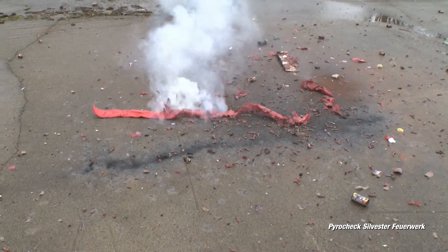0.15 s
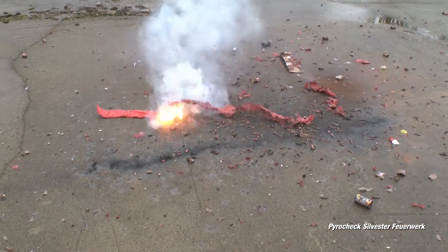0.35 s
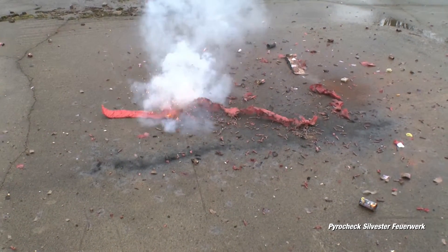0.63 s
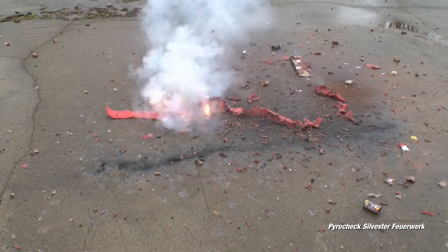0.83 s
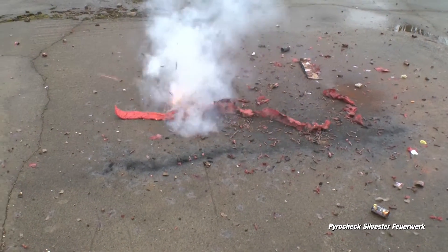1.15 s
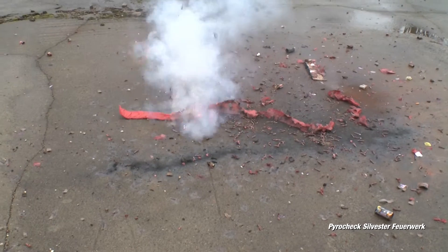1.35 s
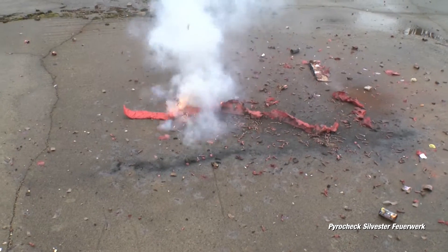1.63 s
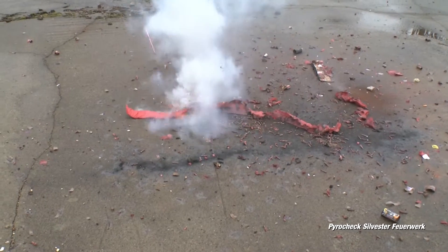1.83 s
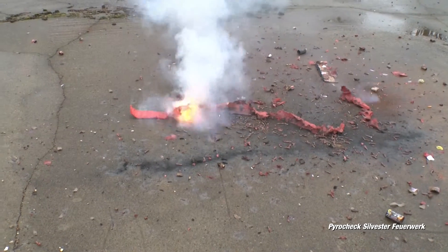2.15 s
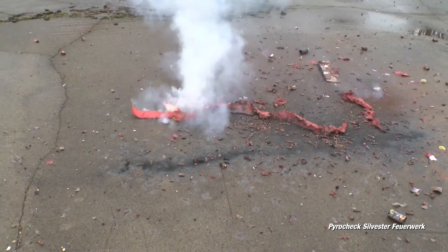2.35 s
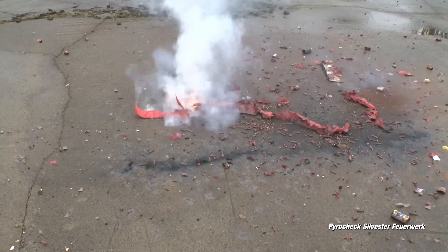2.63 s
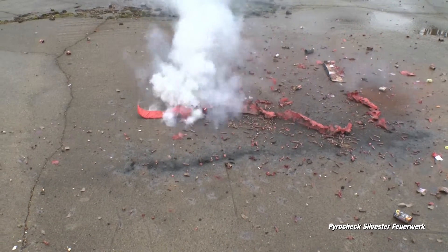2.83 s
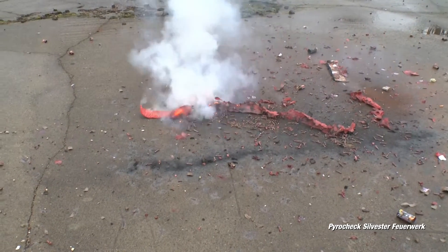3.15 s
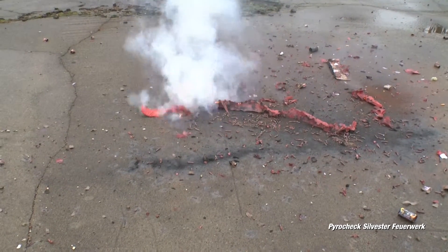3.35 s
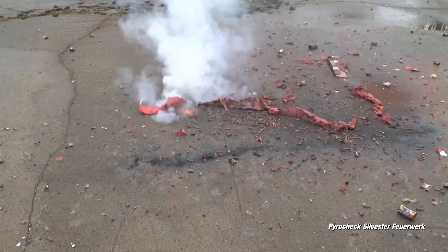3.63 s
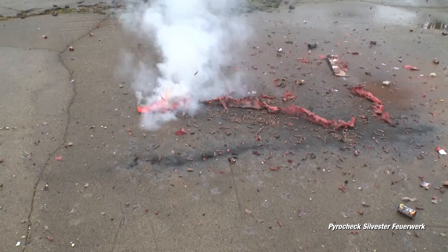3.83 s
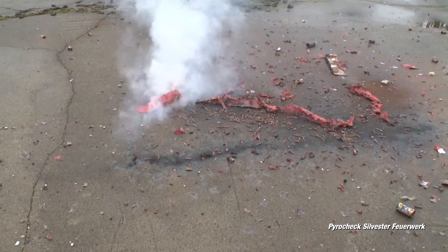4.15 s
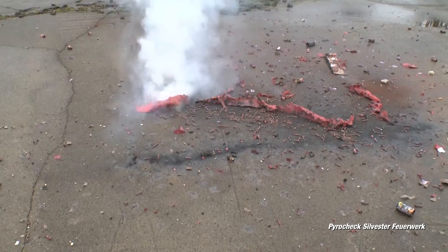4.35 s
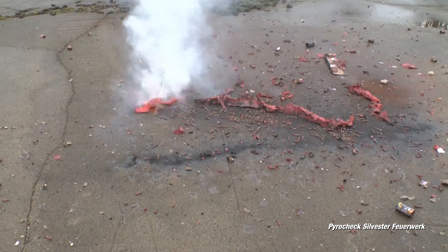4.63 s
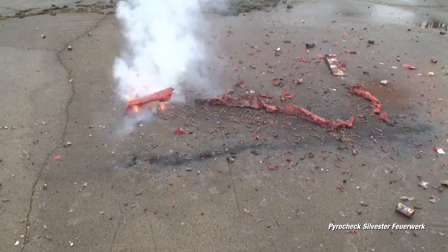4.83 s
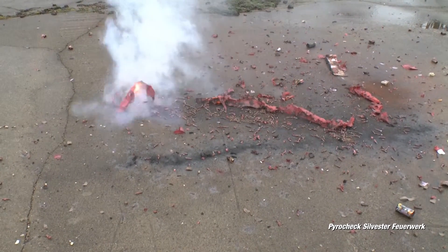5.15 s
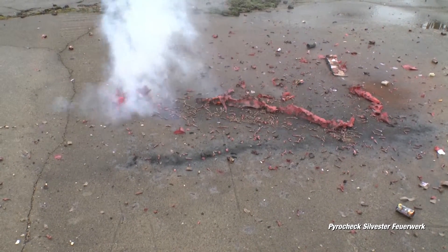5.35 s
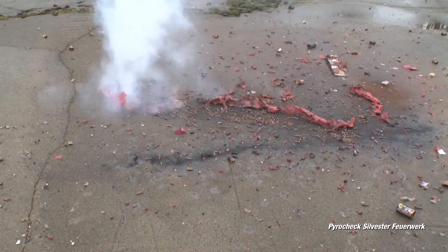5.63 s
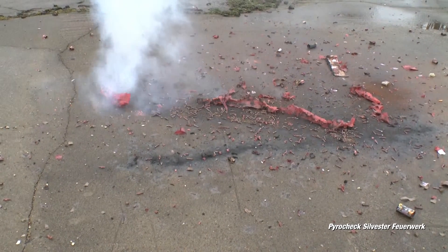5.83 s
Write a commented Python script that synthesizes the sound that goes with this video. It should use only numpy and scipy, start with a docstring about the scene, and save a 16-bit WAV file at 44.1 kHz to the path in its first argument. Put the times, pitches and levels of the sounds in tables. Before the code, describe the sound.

A string of firecrackers goes off outdoors in rapid, irregular sharp bangs, with brief pauses and a bright echo off nearby walls.

```python
"""A concrete yard, where a string of firecrackers burns a few metres from a camera: some 25 sharp bangs
a second, in bursts with short pauses. Each shock front rings the camera's housing, its bass trailing as
a short falling thump, and the highest peaks saturate. Strength, body and sharpness voice each bang.
Walls slap back, and the surroundings answer with a bright, lingering wash over a faint outdoor rumble."""
import sys
import numpy as np
from scipy import signal
from scipy.fft import rfft, irfft, next_fast_len
from scipy.io import wavfile
from scipy.ndimage import uniform_filter1d

SR = 44100
rng = np.random.default_rng(int(sys.argv[2]) if len(sys.argv) > 2 else 0)


def wav_record(signal):
    """Record a signal, one row per channel, as 16-bit PCM in the file named by sys.argv[1]."""
    frames = np.transpose(np.atleast_2d(signal))
    bounded = np.clip(frames, -1, 1)
    # unit amplitude maps onto the largest positive 16-bit level
    quanta = np.round(bounded * 32767).astype(np.int16)
    wavfile.write(sys.argv[1], SR, quanta)


N = 264600

# cue list of the bangs: t/s, strength/dB, body/dB (bass weight), sharpness/dB (treble weight)
BANGS = [(0.1094, -24.5, -8.5, -8.5), (0.2093, -24, -9.5, -2), (0.2342, -23.5, -12.5, 1),
         (0.2608, -33, -12.0, -8), (0.2969, -26, -10.0, 5), (0.321, -31.5, -21, -5),
         (0.339, -25, -12, -5.0), (0.3474, -25.5, -11.5, -11.0), (0.3735, -41, -7, -5),
         (0.4387, -25.0, -10.5, -3.5), (0.4798, -23.5, -10.0, -5), (0.5177, -28, -9, 1.5),
         (0.5243, -36.5, -6.0, 9), (0.5432, -31, -19, -2.0), (0.5515, -31, -10.5, 5.5),
         (0.5575, -32, -9.0, 5), (0.5657, -28, -11, -9), (0.568, -34, -6.0, 5.0), (0.595, -27.5, -10.0, 1),
         (0.605, -40, -13, -5), (0.6253, -27.5, -4.5, -6), (0.6479, -29, -11.0, 1.5),
         (0.7162, -25.5, -9.0, -3.5), (0.745, -26, -10.5, -4), (0.7674, -40, -18.0, -3),
         (0.7888, -27.5, -8.5, -7.5), (0.8309, -28, -14.0, -3.5), (0.8615, -25.5, -4.0, -4.5),
         (0.8885, -29.0, -15.0, -6.5), (0.9399, -28, -16, -8), (0.9678, -30, -10.5, -0.5),
         (0.9725, -27, -11.0, -1.5), (1.0163, -27.5, -15.0, -5.5), (1.0842, -28.5, -9, 2.5),
         (1.105, -30.5, -9, -5.0), (1.146, -25.5, -10.5, -12.5), (1.1711, -35.5, -14, -6),
         (1.2415, -26.0, -6.5, -3.5), (1.262, -30, -12.0, 0), (1.323, -28.5, -21, -8),
         (1.3305, -29, -10.5, -3.0), (1.3384, -25.5, -7, -5), (1.4694, -33.0, -7.5, 9),
         (1.4956, -28.0, -7, 3), (1.5076, -35, -15, -9.0), (1.5718, -28.0, -13, -6.5),
         (1.5888, -25.0, -12.5, -3.5), (1.6111, -27.5, -17, -14), (1.6136, -31.0, -9.5, -1.0),
         (1.6709, -23.5, -11.5, -4), (1.771, -27.0, -4.5, 3), (1.8068, -36.0, -16, -10.5),
         (1.8531, -30, -8, 3.5), (1.8805, -31.0, -10, 0), (2.0663, -24, -2.5, -1),
         (2.1196, -27.0, -5.5, -2.5), (2.1413, -35.0, -13, -11), (2.1576, -25, -9, -9.0),
         (2.1871, -31, -11.5, -4.5), (2.3528, -30, -5, 6.5), (2.3677, -33, -6, 4.5),
         (2.4103, -27.5, -6.5, 2.5), (2.4256, -36, -8, 2), (2.4764, -27.5, -12.5, -11.5),
         (2.5059, -30.5, -8.5, -4.0), (2.5414, -36.5, -12, -8), (2.5759, -26.5, -10.0, -0.5),
         (2.5828, -29, -6.5, 0.5), (2.6157, -29.5, -5.5, -5), (2.703, -27, -6, 0.5),
         (2.7449, -29.5, -13, -5.0), (2.753, -32, -10.5, -8), (2.771, -36.5, -11, 4),
         (2.8317, -28, -9.5, 0), (2.8517, -27.5, -9, -13), (2.8553, -28.5, -7, -8.0),
         (2.91, -29.0, -7.5, 2), (2.9144, -32, -7, 0.0), (2.9266, -27.5, -10.5, -4.5),
         (2.9312, -29.5, -7, -9.0), (2.9383, -38, -6, 7.5), (3.0526, -34.5, -13.0, 4.0),
         (3.0635, -34, -10.5, 9.5), (3.1533, -25.5, -9.5, -5.5), (3.1653, -28.5, -3.0, 3),
         (3.1793, -32, -6, 4.5), (3.1894, -30.5, -11, -7), (3.273, -27.5, -9.5, -7.5),
         (3.2981, -23.5, -8.5, -12.5), (3.3383, -29, -15, -4.0), (3.3536, -27.5, -11.5, -8),
         (3.3907, -28, -12.0, -1.5), (3.3985, -31, -6.0, -1), (3.507, -26, -7, -9), (3.6319, -27, -9, 1.5),
         (3.6892, -27.5, -6, 0.5), (3.7154, -28.5, -7.0, -3), (3.724, -32.5, -5, 5.0),
         (3.7739, -28.5, -11.5, -7.0), (3.8237, -29.5, -6, -2), (3.8476, -25, -7.5, -10.5),
         (3.8696, -27.0, -6.5, -2.5), (3.8935, -35, -12, -10), (3.9409, -28.5, -16.5, -9.5),
         (4.0136, -26, -11.0, -0.5), (4.0409, -29.5, -14, 3.5), (4.056, -34.5, -8, 2),
         (4.065, -32.0, -8.5, 0), (4.1306, -31.5, -7.5, 2), (4.1898, -25.5, -14, -5.5),
         (4.1921, -31, -9.5, -2), (4.2223, -39, -9, -12), (4.237, -30.5, -9.5, -13),
         (4.2626, -28.0, -11.5, -1.5), (4.4057, -26.5, -8.0, -13.5), (4.4454, -26.5, -14, -18),
         (4.6351, -23.5, -10.5, -10.5), (4.6565, -31.5, -19, -3), (4.6619, -27, -13, -2.5),
         (4.6928, -30.5, -11.5, -3), (4.7168, -28, -8, -2), (4.7228, -29, -7, -5), (4.7269, -29, -5.0, -7),
         (4.7559, -30.0, -14, -8.0), (4.7873, -26, 0, -3.5), (4.7981, -36, -9, -6),
         (4.8035, -29, -11.0, -2), (4.8288, -31.5, -9.5, -9.5), (4.8935, -39, -5, -12),
         (4.8975, -30.5, 3.5, 1), (4.9191, -30, -9, 0), (4.9511, -29.0, -9.0, 2.0), (4.9547, -35.5, -7, 3),
         (4.9593, -29.5, -3.0, -3), (5.0702, -30.5, -12.5, -2), (5.0769, -34, -4, -10),
         (5.138, -26, -7.0, -10.5), (5.238, -33, -14.0, -7.5), (5.2974, -28, -6.5, -10),
         (5.3285, -30, -7.5, 3.5), (5.4197, -26.5, -9, 0), (5.6592, -21.5, -6.5, -6)]
# the four bands of a bang (boom, thud, crack, snap): low f/Hz, high f/Hz
BAND_EDGES = [(25, 380), (400, 1400), (1400, 6000), (6500, 16000)]
# EQ point of each band: f/Hz
BAND_CENTRES = [260, 600, 2900, 10000]


def firecrackers(size=2048, spot_count=6):
    """Each charge's shock as heard at the camera, and as it leaves one of a few spots on the string."""
    t, hz = np.arange(size) / SR, np.fft.rfftfreq(size, 1 / SR)
    ports = dispersion(hz) * stereo_tilt(hz)
    bands = np.array([(hz >= low) & (hz < high) for low, high in BAND_EDGES])
    window = SR / 100  # band power is taken over 10 ms
    fade = np.minimum(1, 2 * (1 - np.arange(size) / size)) ** 2
    eq = lambda db: causal(amp(along(np.transpose([BAND_CENTRES, db]), hz)))
    direct, spots = np.zeros((2, N + size)), np.zeros((spot_count, N + size))
    for k, (onset_s, strength_db, body_db, sharp_db) in enumerate(BANGS):
        band_db = charge_voicing(strength_db, body_db, sharp_db)
        heard = shock_front(t, hz) * ports * (boom(hz, band_db[0], sharp_db) + housing_ring(hz))
        power = 2 * bands @ np.abs(heard.mean(0)) ** 2 / size / window
        eq_db = band_db - 10 * np.log10(power)
        # summed over all directions, the blasts differ less in colour
        all_round_db = eq_db + 0.69 * (eq_db[1:].mean() - eq_db)
        start = int(onset_s * SR)
        direct[:, start:start + size] += fade * irfft(heard * eq(eq_db))
        spots[k % spot_count, start:start + size] += fade * irfft(eq(all_round_db))
    return direct[:, :N], spots[:, :N]


# boom, thud, crack, snap against a bang's strength: level/dB, dB per dB of body, dB per dB of sharpness
VOICING = [(1.5, 1.21, 0), (-5, 0.3378, 0), (-1.66, -0.0763, 0), (-1, -0.11, 1)]


def charge_voicing(strength_db, body_db, sharp_db):
    """Charge and wrapping set the levels of boom, thud, crack and snap."""
    base_db, per_body, per_sharp = np.transpose(VOICING)
    return strength_db + base_db + per_body * body_db + per_sharp * sharp_db


def shock_front(t, hz):
    """Spectrum of a pressure spike, the tube's ragged tearing, and scatter off nearby surfaces."""
    burst = lambda db, t60: rfft(amp(db - 60 * t / t60) * stereo(len(t), side_db=-14))
    tear = burst(db=-10.5, t60=0.0043)
    scatter = rfft(amp(-25.5 - 60 * t / 0.021) * stereo(len(t), side_db=-7.5))
    # long waves leave the burst smoothly: the tear has little bass
    tear *= along([(300, 0.046), (2000, 0.52), (7000, 0.72)], hz)
    scatter *= along([(200, 1.0), (1500, 0.47), (5000, 0.84)], hz)
    return 1 + tear + scatter


# feeble charges pop high, ordinary ones thump low, the heaviest fill the low mids: level/dB, base f/Hz
BOOM_TUNING = [(-54, 220), (-43.5, 182), (-36.5, 130), (-31, 136), (-27, 182)]


def boom(hz, boom_db, sharp_db, drop_oct_per_db=0.0355):
    """The ball of hot gas swells and falls back about once; a sharper bang thumps lower."""
    pitch_hz = np.interp(boom_db, *np.transpose(BOOM_TUNING)) * 2 ** (-drop_oct_per_db * sharp_db)
    weight = amp(0.25 * sharp_db)  # a sharp bang's boom gains on the housing's ring
    return weight * resonance(hz, pitch_hz, width=1.15 * pitch_hz)


# modes of the camera's housing: f/Hz, width/Hz, level/dB
HOUSING_MODES = [(517, 142, -2.5), (727, 82, -9), (982, 330, -13.5), (1433, 89, -7), (1893, 300, -2),
                 (2417, 343, -1.5), (2816, 380, -13.5), (3343, 290, -9), (3864, 450, -9),
                 (4400, 240, -13.5), (5105, 220, -11.5), (5650, 236, -10), (6260, 470, -13.5),
                 (8420, 1150, -13), (11200, 8200, -29)]


def housing_ring(hz, spread_db=0.5, detune=0.012):
    """The housing's ring at each microphone port; every angle of arrival excites it differently."""
    centre, width, db = np.transpose(HOUSING_MODES)[..., None]
    gain = amp(db + spread_db * rng.standard_normal(db.shape))
    shared, per_port = rng.standard_normal(db.shape), rng.standard_normal((2, *db.shape))
    centre = centre * (1 + detune * (shared + 0.5 * per_port))
    roll_off_db = along([(9500, 1), (11000, 0.5), (12200, -8), (15000, -9), (16500, -21.5)], hz)
    return np.sum(gain * resonance(hz, centre, width), axis=1) * causal(amp(roll_off_db))


def dispersion(hz, bass_hz=220, mid_hz=980, treble_hz=3780, mismatch=0.21):
    """Lows arrive late, so a spike becomes a short falling sweep, a little unlike at the two ports."""
    port = np.array([[1 + mismatch], [1 - mismatch]])
    all_pass = lambda corner: (corner - 1j * hz) / (corner + 1j * hz)
    return all_pass(bass_hz) * all_pass(mid_hz * port) * all_pass(treble_hz) ** 2


# pan of the direct bangs: f/Hz, left minus right level/dB
PAN = [(100, -0.2), (400, 0.4), (700, 2), (1400, 1), (1900, 5), (2900, 5), (5000, 3.5), (7500, -1),
       (10000, 2), (14000, 8.5)]


def stereo_tilt(hz):
    """Left and right gains: the bangs lean left, mostly in the crack and the very top."""
    return amp(np.outer([0.5, -0.5], along(PAN, hz)))


# slapback from single walls: delay t/s, level/dB before the yard's EQ
WALL_SLAPS = [(.0145, -35.5), (0.025, -28.5), (0.0288, -33.5), (.099, -34), (.174, -32), (.231, -32.5)]
# envelope of the scattered tail: delay t/s, relative level/dB
TAIL_ENVELOPE = [(.003, 14.5), (.012, 6), (.03, 1), (.048, -10), (.075, -12.5), (.098, 2.5), (.125, -10),
                 (.165, -5.5), (.19, -2), (.25, -3), (.3, -7.5), (.35, -12), (.42, -9), (.7, -11.5),
                 (1.2, -42)]
# EQ of the yard's reflections: f/Hz, level/dB
YARD_EQ = [(40, -38), (120, -2.5), (300, -16), (550, -9), (1000, -12.5), (1500, -7.5), (2100, 0),
           (3500, -1), (7000, -4.5), (10000, -5.5), (12500, -11.5), (16000, -27)]


def yard_echo(wet_db=-15, grain_db=3, air_loss_db_per_s=51):
    """One spot's impulse response: grainy scatter and wall slaps, dulling with distance."""
    size = SR * 6 // 5
    t = np.arange(size) / SR
    grains = amp(grain_db * unit(uniform_filter1d(rng.standard_normal(size), size=40)))
    tail = stereo(size, side_db=-7.5) * grains * amp(np.interp(t, *np.transpose(TAIL_ENVELOPE)))
    tail *= amp(wet_db) / np.linalg.norm(tail[0])
    for delay_s, db in WALL_SLAPS:
        # a rough wall spreads its slap over about a millisecond
        slap = stereo(size=48, side_db=-8) * np.hanning(48)
        at = int(abs(delay_s + rng.normal(0, 0.0003)) * SR)
        tail[:, at:at + slap.shape[1]] += amp(db) * slap / np.linalg.norm(slap[0])
    hz, travel_s, spectra = signal.stft(tail, SR, nperseg=256)
    loss_db = air_loss_db_per_s * np.outer((hz / 10000) ** 2, travel_s)  # the rate holds at 10 kHz
    return signal.istft(spectra * amp(along(YARD_EQ, hz)[:, None] - loss_db), SR, nperseg=256)[1]


def echoes(spots):
    """Each spot on the string sends its bangs along slightly different paths."""
    return sum(signal.fftconvolve(spot[None], yard_echo(), axes=1)[:, :N] for spot in spots)


# spectrum of the outdoor bed: f/Hz, relative level/dB
AIR_BED = [(25, -32), (60, -3), (105, 16.5), (200, 15), (500, 7), (1200, -5), (4000, -12), (9000, -55),
           (16000, -38)]


def background():
    """Faint outdoor rumble, and the dying wash of earlier bangs, dulled by its long paths."""
    air = unit(filtered(stereo(N, side_db=-30), lambda hz: amp(along(AIR_BED, hz))))
    wash = unit(filtered(stereo(N, side_db=-9.5), lambda hz: amp(along(YARD_EQ, hz) - hz / 1200)))
    return amp(-68.5) * air + amp(-52.5 - 22 * np.arange(N) / SR) * wash


def amp(db):
    """Decibels to gain."""
    return 10 ** (np.asarray(db) / 20)


def unit(x):
    """Scaled to rms 1."""
    return x / np.sqrt(np.mean(x ** 2) + 1e-20)


def along(points, hz):
    """A curve of (f/Hz, value) points, read on a log axis."""
    f, value = np.transpose(points)
    return np.interp(np.log(hz + 1), np.log(f + 1), value)


def filtered(x, response):
    """x through a frequency response."""
    size = next_fast_len(x.shape[-1] + SR // 2)
    return irfft(rfft(x, size) * response(np.fft.rfftfreq(size, 1 / SR)), size)[..., :x.shape[-1]]


def causal(gain):
    """The minimum-phase response with this gain."""
    cepstrum = irfft(np.log(gain + 1e-6))
    half = cepstrum.shape[-1] // 2
    cepstrum[..., 1:half] *= 2
    cepstrum[..., half + 1:] = 0
    return np.exp(rfft(cepstrum))


def resonance(hz, centre, width):
    """Response of one damped mode, 1 at its centre."""
    return 1j * hz * width / (centre ** 2 - hz ** 2 + 1j * hz * width)


def stereo(size, side_db):
    """Mid/side noise at two close microphones; side_db sets the width."""
    mid, side = rng.standard_normal((2, size))
    return unit(np.array([mid + amp(side_db) * side, mid - amp(side_db) * side]))


def scene():
    """The mix: bangs up front, their echoes behind, open air underneath."""
    direct, spots = firecrackers()
    return amp(0.43) * direct + amp(0.82) * echoes(spots) + background()


def record(dry, low_cut_hz=36, ceiling_db=-7, top_hz=16300):
    """The microphones shed the deepest bass and soft-clip the peaks; a steep high cut follows."""
    thinned = filtered(dry, lambda hz: 1j * hz / (low_cut_hz + 1j * hz))
    rounded = thinned / (1 + (thinned / amp(ceiling_db)) ** 4) ** (1 / 4)
    return filtered(rounded, lambda hz: 1 / np.sqrt(1 + (hz / top_hz) ** 120))


dry = scene()
out = record(dry)
wav_record(out)
```